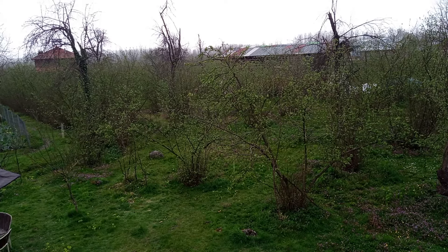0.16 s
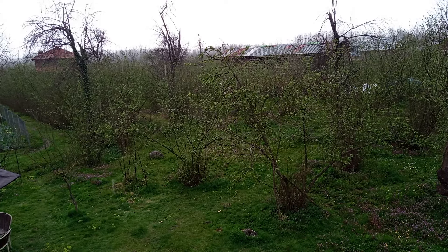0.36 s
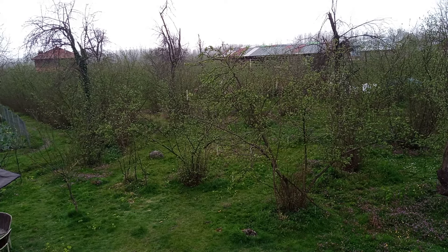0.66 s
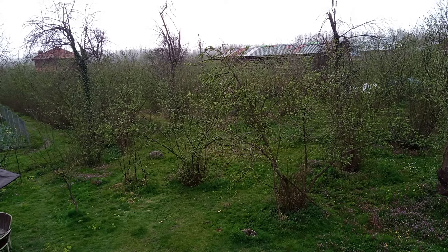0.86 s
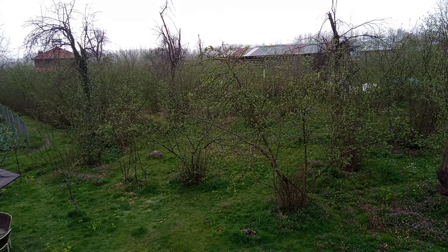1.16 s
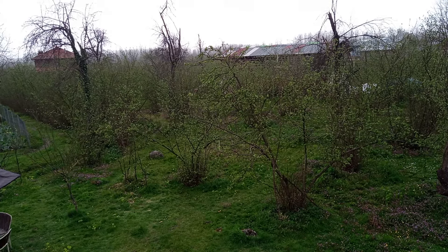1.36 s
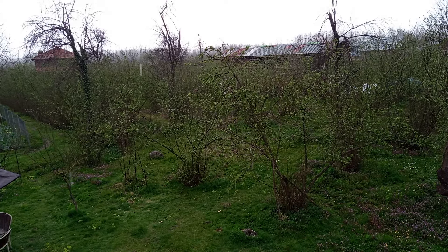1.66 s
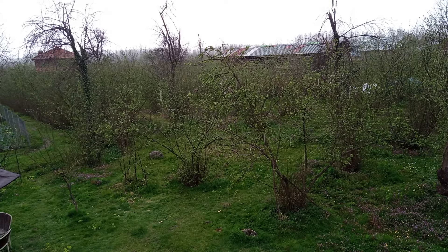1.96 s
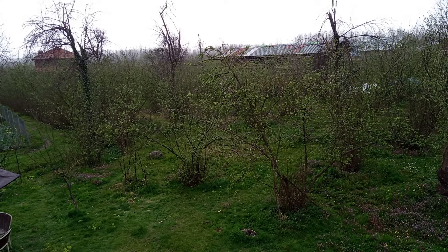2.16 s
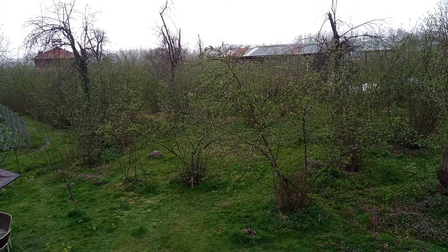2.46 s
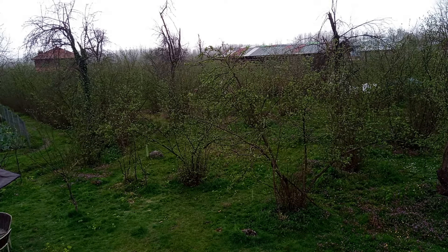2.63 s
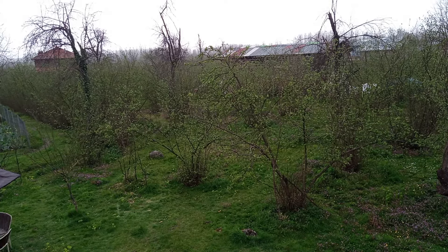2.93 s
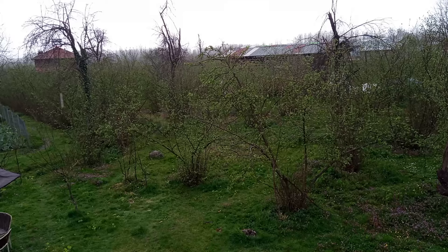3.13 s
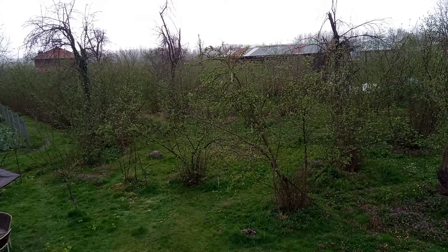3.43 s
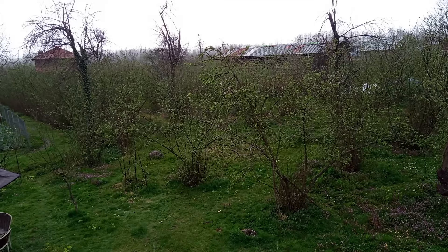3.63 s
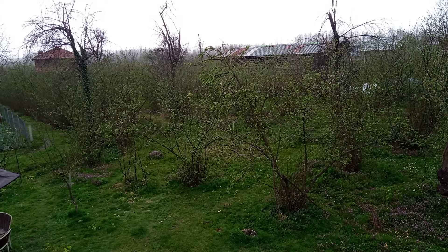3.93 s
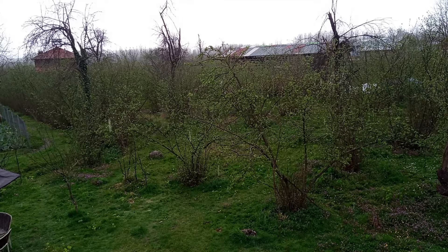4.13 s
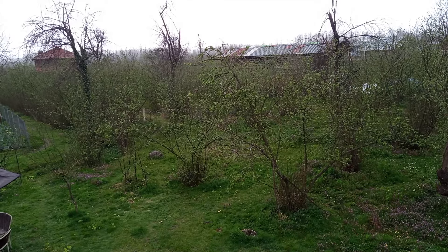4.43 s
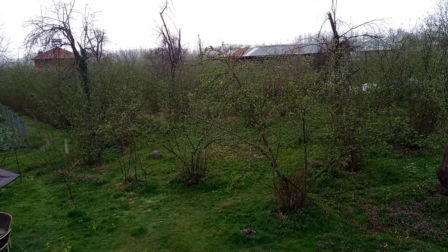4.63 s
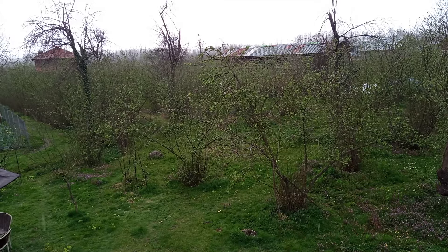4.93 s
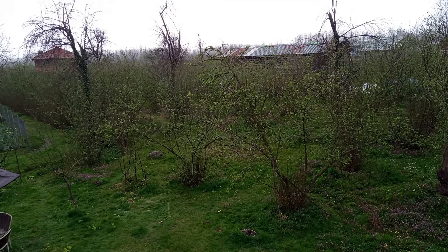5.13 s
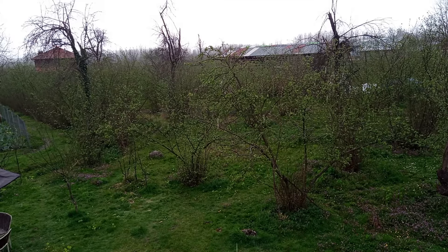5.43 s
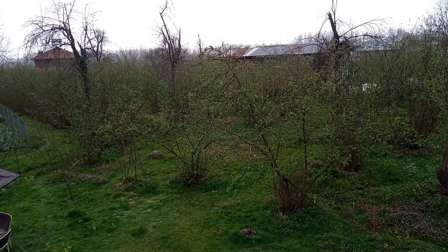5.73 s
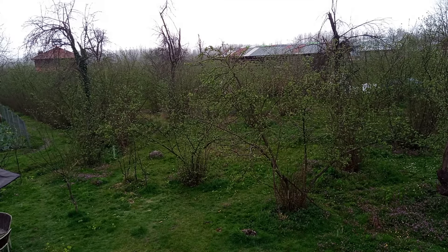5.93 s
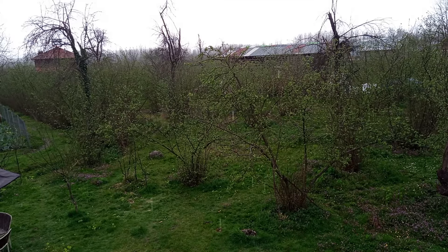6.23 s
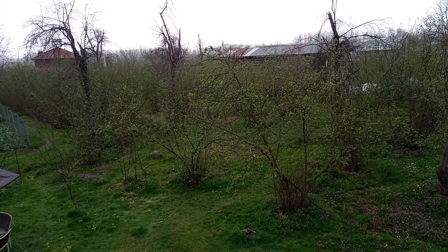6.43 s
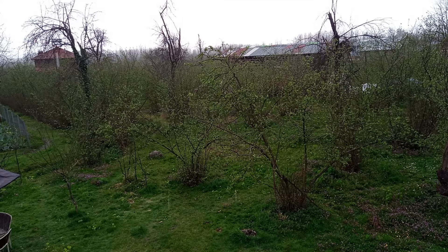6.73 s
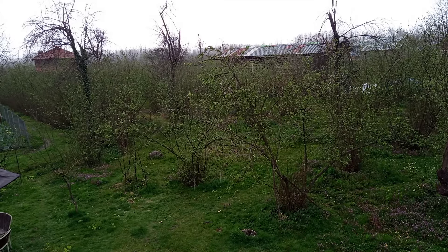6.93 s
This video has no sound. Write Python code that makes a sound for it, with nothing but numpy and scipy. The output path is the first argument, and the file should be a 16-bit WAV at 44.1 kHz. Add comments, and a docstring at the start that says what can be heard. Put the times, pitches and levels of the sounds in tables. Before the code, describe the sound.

Rain falling over a garden orchard, heard from beside a house. It starts almost silent, drops thicken during the first second, then a dense, bright, crackling spatter holds steady with small surges. Water gurgles faintly beneath, with a few dull bumps. Near 5.8 seconds it slackens briefly, then snaps back to full strength. Close microphone, same in both channels, short echo from near walls.

```python
"""A dense shower of tiny drops spatters close by; it builds up, surges, slackens briefly and returns.
Rain over an orchard, heard from the house: random clicks make the spatter, and near walls colour it.
Gathering water gurgles with short bubble tones. Resonances stirred by noise make a few dull sounds.
Behind them lie far rain (blurred clicks), a low rumble with drips, and puffs of air (coloured noise).
Both channels are alike."""
import sys
import numpy as np
from scipy import signal
from scipy.fft import rfft, irfft
from scipy.io import wavfile

SR = 44100
rng = np.random.default_rng(int(sys.argv[2]) if len(sys.argv) > 2 else 0)


def output_pcm(signal):
    """Save a mono or channel-first signal as 16-bit PCM at the path in sys.argv[1].

    Samples are clipped to [-1, 1] before scaling.
    """
    pcm = np.clip(np.atleast_2d(signal).T, -1, 1) * 32767
    wavfile.write(sys.argv[1], SR, np.round(pcm).astype(np.int16))


N = 312228  # length in samples
T = np.arange(N) / SR  # time of each sample in seconds
HZ = np.maximum(np.arange(N // 2 + 1) * SR / N, 1)  # frequencies of the spectrum, kept above zero


def water():
    """The flow of the water, and what its surges add to the spatter and to the bubbling, all in dB."""
    # strength of the close spatter over time: [t/s, level/dB]
    flow = [(0.0, -77), (0.07, -65), (0.17, -64), (0.31, -52.5), (0.37, -45.5), (0.52, -44.5),
            (0.85, -46.5), (0.98, -41.5), (1.005, -37.5), (1.2, -35.1), (4.9, -35), (5.64, -35.5),
            (5.70, -41), (5.89, -48), (5.95, -44), (6.07, -45.5), (6.11, -35), (7.07, -35.5)]
    # surges (+) and slackenings (-): [start t/s, spatter lift/dB, bubbling lift/dB, fall time/s]
    surges = [(1.06, -4.5, 2, .03), (1.115, 4.5, 4.5, 0.057), (1.44, -0.8, -3, .13), (1.61, 4, 3, 0.12),
              (1.86, -1.5, 3.5, .1), (2.295, 1, -1, 0.057), (2.41, -1.5, 3.5, .06), (2.96, 2, 8, 0.2),
              (3.075, 2.5, 1, 0.056), (3.26, -2.5, 1.5, 0.11), (3.395, 3.8, -1.5, 0.045),
              (3.62, -1.5, 0, .1), (3.85, 1.5, 7.5, .06), (3.925, 2.3, 3, 0.13), (4.61, -1.5, -2, 0.069),
              (4.78, 2.5, -1, .1), (4.86, 0.8, 2, .1), (5.17, 1, 2, 0.12), (6.51, 3, -0.5, 0.1),
              (6.58, -2.5, 4.5, 0.14), (6.71, -1.5, 3, 0.047)]
    rise_s = 0.017
    times, levels = np.transpose(flow)
    flow_db = np.interp(T, times, levels)
    surge_db, stir_db = np.zeros(N), np.zeros(N)
    for start_s, spatter_lift, bubbling_lift, fall_s in surges:
        shape = swell(start_s + rise_s, rise_s, fall_s)
        surge_db += spatter_lift * shape
        stir_db += bubbling_lift * shape
    return flow_db, surge_db, stir_db


def follow(flow_db, full_db, slope, lag_s):
    """One part of the sound trails the flow: full_db at the usual flow, slope dB per dB of change."""
    late_flow_db = np.interp(T - lag_s, T, flow_db)
    return full_db + slope * (late_flow_db - np.median(flow_db))


def fat_drop_level(flow_db, surge_db, stir_db):
    """Fat drops follow the flow, part of each surge and part of the bubbling, with splats on top (dB)."""
    level_db = follow(flow_db, full_db=-41, slope=1.11, lag_s=0.02)
    level_db = level_db + 0.61 * surge_db + 0.23 * stir_db
    return level_db + 0.93 * splats(per_s=30, decay_s=0.056)


def spray_level(flow_db, surge_db):
    """Fine spray sets in a moment after the first drops, at once at the strength of a light flow (dB)."""
    starts_s, grows_s, off_db = 0.17, 0.05, -26
    least_flow_db = -46  # the weakest flow that the spray follows
    level_db = follow(np.maximum(flow_db, least_flow_db), full_db=-40, slope=1.23, lag_s=0.01)
    still_off = (1 - np.tanh((T - starts_s) / grows_s)) / 2
    return level_db + 0.27 * surge_db + off_db * still_off


def drop_clicks(flow_db, drops_per_s=18000):
    """Each drop lands as a click, echoed by near walls; a weaker flow brings fewer drops."""
    density = np.sqrt(undb(flow_db - np.median(flow_db)))  # 1 at the usual flow
    # dividing by sqrt(density) keeps the loudness even; the level comes later
    clicks = impacts(drops_per_s * density, spread_db=1.37) / np.sqrt(density)
    return walls(clicks, wet_db=1.5, t60=0.27)


def mist(spray_db, flicker_db, cap_db=-59):
    """A thin fizz of the tiniest droplets sets in with the spray; its base level is capped, and it flickers."""
    droplets = impacts(4000, spread_db=2)
    fizz = unit(irfft(rfft(droplets) * resonance(15000, 1800) ** 2, N))
    return fizz * undb(np.minimum(spray_db - 5, cap_db) + 1.3 * flicker_db)


def spatter(flow_db, surge_db, stir_db):
    """Dense drop clicks, coloured by what they hit; the mix of fat drops and fine spray shifts with the flow."""
    # colour of the spatter: [f/Hz, relative level/dB]
    splash_colour = [(600, -60), (1000, -37), (1600, -17.5), (2000, -5), (2700, 1.5), (3400, 2.5),
                     (6600, 3.5), (8100, -4), (9300, -1), (10500, -1.5), (13800, -16), (14700, -8),
                     (15800, -10)]
    # narrow resonances where the water lands: [f/Hz, lift/dB before the extra lift]
    rings = [(1782, 2.6), (1911, 2.1), (2003, 3.3), (2067, 4.0), (2175, 3.1), (2562, 3.0), (2611, 2.8),
             (2676, 5.7), (2735, 3.4), (2998, 2.2), (3101, 2.1), (3144, 2.7), (3919, 3.1), (4075, 2.2),
             (4484, 2.1), (4538, 2.2), (4700, 2.1), (5286, 2.9), (5421, 4.2), (5717, 2.1), (5760, 2.1),
             (6045, 2.2), (6428, 2.6)]
    extra_lift_db, ring_width_hz = 1.5, 19
    fat_db = fat_drop_level(flow_db, surge_db, stir_db)
    fine_db = spray_level(flow_db, surge_db)

    ringing = 1
    for hz, lift_db in rings:
        ringing = ringing + (undb(extra_lift_db + lift_db) - 1) * resonance(hz, ring_width_hz)
    spectrum = rfft(colour(drop_clicks(flow_db), splash_colour)) * ringing

    # fat drops sound low, fine spray high, the rest in between
    fat = 1 / (1 + (HZ / 3300) ** 12)
    fine = 1 / (1 + (7500 / HZ) ** 20)
    burst_db = 0.31 * splats(per_s=83, decay_s=0.011)
    flicker_db = 0.82 * splats(per_s=22, decay_s=0.013)
    sizes = [(fat, fat_db), (1 - fat - fine, flow_db + surge_db), (fine, fine_db + flicker_db)]
    drops = np.zeros(N)
    for share, level_db in sizes:
        drops += unit(irfft(spectrum * share, N)) * undb(level_db + burst_db)
    return drops + mist(fine_db, flicker_db)


def gurgle(flow_db, stir_db):
    """Bubbles ring in the gathering water and linger between the walls; surges change their level."""
    # colour of the bubbling: [f/Hz, relative level/dB]
    gurgle_colour = [(300, -30), (450, -4.5), (600, -13.5), (780, -13), (950, -4.5), (1400, 0), (1900, 4),
                     (2400, -1), (3200, -13), (12000, -25)]
    level_db = follow(flow_db, full_db=-54.5, slope=0.21, lag_s=0.025)
    level_db = level_db + stir_db + 1.5 * walk(8.4)
    plinks = bubbles(count=2200, low_hz=483.5, high_hz=2894, cycles=15.4, spread_db=8, glide=0.0077)
    echoed = walls(plinks, wet_db=4, t60=0.39)
    return unit(colour(echoed, gurgle_colour)) * undb(level_db)


def small_sounds():
    """Dull bumps, hollow splashes and one thin squeak: each is noise in one pitch band that swells and fades."""
    # dull bumps: [peak t/s, pitch f/Hz, level/dB, rise plus fall time/s]
    bumps = [(.95, 147, -54, 0.043), (1.306, 384, -53.5, .08), (2.108, 392, -55.5, 0.15),
             (2.147, 175.5, -48, 0.16), (3.042, 121, -51, 0.062), (3.245, 328, -54.5, 0.074),
             (3.526, 134, -55.5, 0.14), (4.44, 296, -59.5, 0.19), (5.59, 268, -54, 0.048),
             (5.72, 123, -60, .06), (6.477, 124, -56, 0.044), (6.77, 340, -56, .11), (6.837, 114, -50, .04)]
    # hollow splashes: [peak t/s, pitch f/Hz, level/dB]
    hollow_splashes = [(0.078, 1720, -62), (.11, 605, -65.5), (1.69, 934, -51.5), (2.75, 500, -60),
                       (3.53, 2650, -37.5), (3.74, 436, -60), (6.16, 2850, -37.5), (6.622, 936, -54.5)]
    rise_share = 0.59  # share of a bump's length spent rising
    out = ring(swell(0.067, rise_s=0.01, fall_s=0.02), hz=10160, width_hz=250, db=-62)  # the squeak
    for peak_s, hz, db, length_s in bumps:
        envelope = swell(peak_s, rise_share * length_s, (1 - rise_share) * length_s)
        out += ring(envelope, hz, 0.15 * hz, db)
    for peak_s, hz, db in hollow_splashes:
        out += ring(swell(peak_s, rise_s=0.028, fall_s=0.068), hz, 0.12 * hz, db)
    return out


def far_rain(level_db=-66):
    """Countless drops on distant leaves and grass blur into a soft hiss."""
    # colour of the far rain: [f/Hz, relative level/dB]
    hiss_colour = [(400, -12), (600, 5), (780, -8), (1000, 2.5), (1400, 6), (1900, -5), (2600, 1),
                   (4800, 7), (6500, -30), (8000, -33), (15000, -27)]
    drift_db = 2.5 * walk(4)
    hiss = unit(colour(impacts(6000, spread_db=1.5), hiss_colour))
    return hiss * undb(level_db + drift_db)


def rumble(level_db=-60.5, growth_db_per_s=0.34):
    """A low, restless outdoor noise with dull, heavy drips in it; it slowly grows."""
    # colour shared by the rumble and the drips: [f/Hz, relative level/dB]
    rumble_colour = [(30, -13), (70, -3), (125, 1), (180, 0), (240, -3.5), (300, 2), (335, -5), (380, 2.5),
                     (440, -11), (700, -23.5), (1200, -23), (5000, -80)]
    plops = bubbles(count=260, low_hz=94.0, high_hz=680, cycles=5.9, spread_db=10.5, glide=0.003)
    drips = unit(colour(walls(plops, wet_db=0, t60=0.25), rumble_colour)) * undb(-2.0)
    steady = unit(colour(noise(), rumble_colour)) * undb(-4 - 0.5 * walk(9.0))
    growth_db = growth_db_per_s * (T - T.mean())
    return (steady + drips) * undb(level_db + growth_db)


def air(breeze_db=-71.5, restless_db=3.0):
    """Light puffs of wind buffet the microphone over a faint, restless breeze."""
    # colour of the moving air: [f/Hz, relative level/dB]
    air_colour = [(10, -30), (25, -25), (42, -7.5), (65, 1.5), (100, -1.5), (150, -7.5), (300, -27),
                  (1500, -71)]
    # the stronger puffs: [peak t/s, level/dB]
    puffs = [(.23, -60), (.35, -56), (.56, -58), (1.06, -61), (1.52, -57), (2.14, -56.5), (2.58, -65),
             (2.76, -58), (2.98, -69), (3.42, -60), (3.52, -54), (4.14, -65), (4.28, -55), (4.73, -61.5),
             (5.03, -62), (5.7, -61), (6.5, -45.5), (6.82, -54), (6.95, -51)]
    strength = undb(breeze_db + restless_db * walk(5.1))
    for peak_s, db in puffs:
        strength = strength + undb(db) * swell(peak_s, rise_s=0.037, fall_s=0.048)
    return unit(colour(noise(), air_colour)) * strength


def impacts(per_s, spread_db):
    """Drops landing at random moments as single-sample clicks: many small, a few large."""
    lands = rng.random(N) < per_s / SR
    size = undb(spread_db * np.minimum(rng.exponential(size=N), 6))
    return unit(lands * size * rng.choice([-1, 1], N))


def bubbles(count, low_hz, high_hz, cycles, spread_db, glide):
    """Short damped tones at random moments; each rises a little as its bubble nears the surface."""
    out = np.zeros(N)
    for when, pitch, size in rng.random((count, 3)):
        hz = low_hz * (high_hz / low_hz) ** pitch
        start = int(when * N)
        length = min(int(5 * cycles / hz * SR), N - start)
        age = T[:length] * hz / cycles  # 1 when the tone has faded to about a third
        tone = np.exp(-age) * np.sin(2 * np.pi * cycles * age * (1 + glide * age))
        out[start:start + length] += undb(spread_db * size) * hz * tone
    return unit(out)


def splats(per_s, decay_s):
    """Swell left by larger drops: each jumps up at once and dies away. Mean 0, spread 1."""
    kicks = (rng.random(N) < per_s / SR) * rng.random(N)
    trail = signal.lfilter([1], [1, -np.exp(-1 / (decay_s * SR))], kicks)
    return unit(trail - trail.mean())


def walls(x, wet_db, t60):
    """Direct sound plus a dense echo that fades by 60 dB in t60 seconds; the echo paths keep changing."""
    # drops land here and there: six drifting weights share the sound among six echoes
    places = np.array([walk(40) for _ in range(6)])
    places /= np.linalg.norm(places, axis=0)
    fade = np.exp(-np.log(1000) * T / t60) * (T > 0.002)
    echo = irfft(sum(rfft(x * here) * rfft(noise() * fade) for here in places), N)
    return unit(x + undb(wet_db) * unit(echo))


def ring(envelope, hz, width_hz, db):
    """A resonance used twice on noise under an envelope, set to the given level."""
    sound = envelope * irfft(rfft(noise()) * resonance(hz, width_hz) ** 2, N)
    return undb(db) * sound * np.sqrt(np.sum(envelope ** 2) / np.sum(sound ** 2))


def resonance(hz, width_hz):
    """Response of one resonance, gain 1 at its centre."""
    return 1 / (1 + 1j * (HZ ** 2 - hz ** 2) / (HZ * width_hz))


def swell(s, rise_s, fall_s):
    """Envelope that rises smoothly to 1 at time s and dies away."""
    before, after = np.minimum(T - s, 0), np.maximum(T - s, 0)
    return np.exp(-(before / rise_s) ** 2 - after / fall_s)


def colour(x, points):
    """Filter through (Hz, dB) points; its response never starts ahead of the sound."""
    hz, db = np.transpose(points)
    gain = undb(np.interp(np.log(HZ), np.log(hz), db))
    # folding the cepstrum (the transform of the log gain) gives the filter its minimum phase
    cepstrum = irfft(np.log(gain), N)
    cepstrum[1:N // 2] *= 2
    cepstrum[N // 2 + 1:] = 0
    return irfft(rfft(x) * np.exp(rfft(cepstrum)), N)


def walk(rate):
    """Smooth random drift with rms 1, mostly slower than rate in Hz."""
    return unit(irfft(rfft(noise()) / (1 + (HZ / rate) ** 4), N))


def noise():
    """White noise: equally strong at all frequencies."""
    return rng.standard_normal(N)


def undb(db):
    """Decibels to gain."""
    return 10 ** (np.asarray(db) / 20)


def unit(x):
    """Scale to rms 1."""
    return x / np.sqrt(np.mean(x ** 2))


def scene():
    """All sources meet at one microphone that feeds both channels."""
    flow_db, surge_db, stir_db = water()
    close = spatter(flow_db, surge_db, stir_db) + gurgle(flow_db, stir_db) + small_sounds()
    background = far_rain() + rumble() + air()
    mono = close + background
    return np.array([mono, mono])


def record(dry):
    """The recorder cuts the top steeply, above 15750 Hz."""
    top_cut = signal.ellip(12, 0.1, 80, 15750, fs=SR, output="sos")
    return signal.sosfilt(top_cut, dry)


dry = scene()
out = record(dry)
output_pcm(out)
```